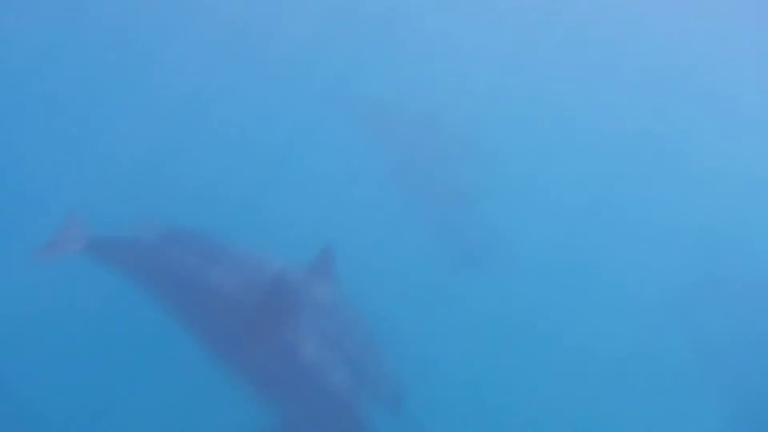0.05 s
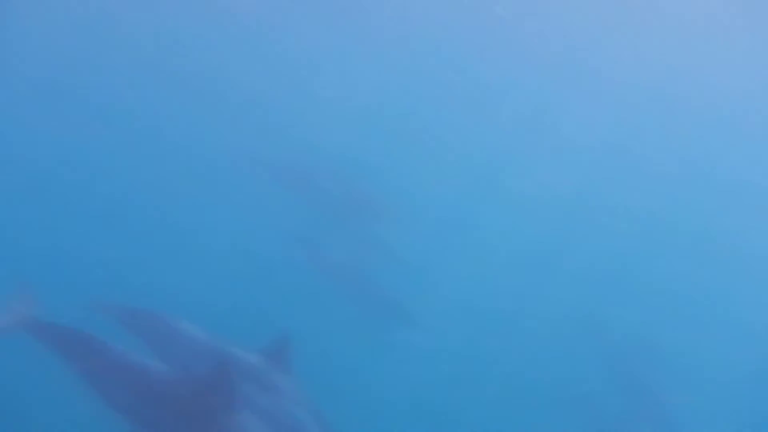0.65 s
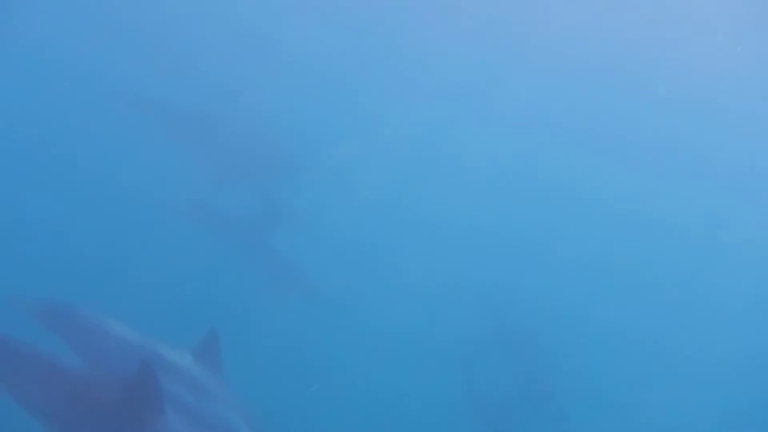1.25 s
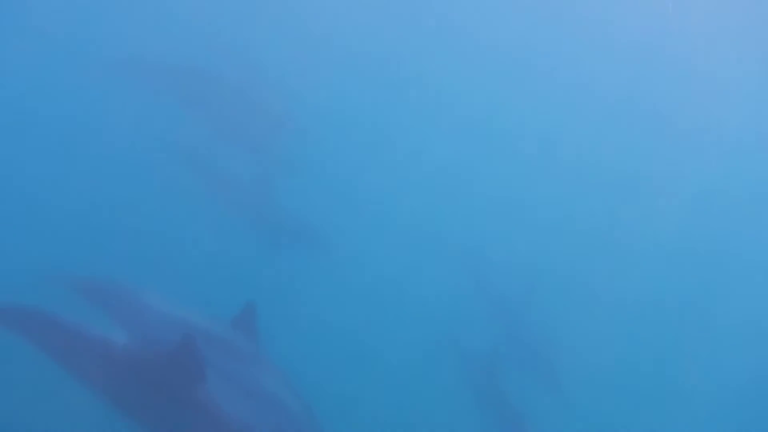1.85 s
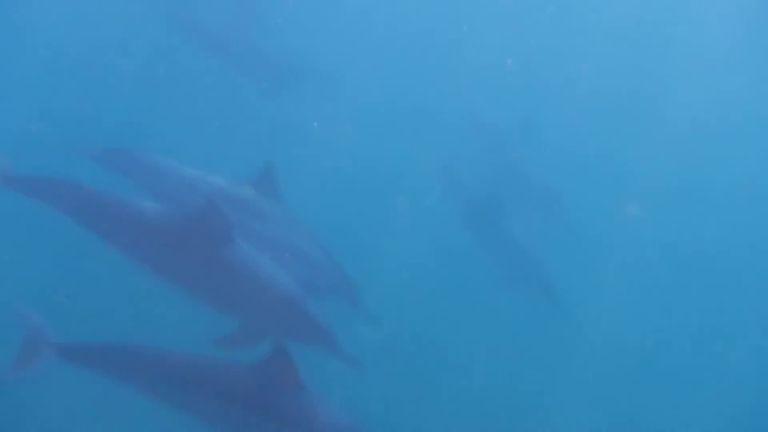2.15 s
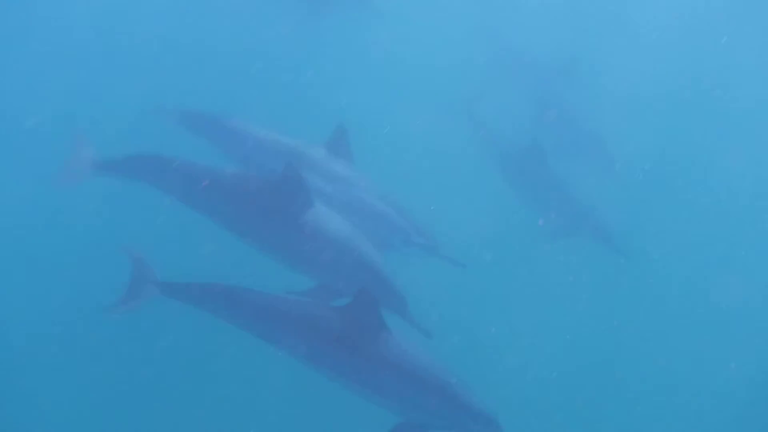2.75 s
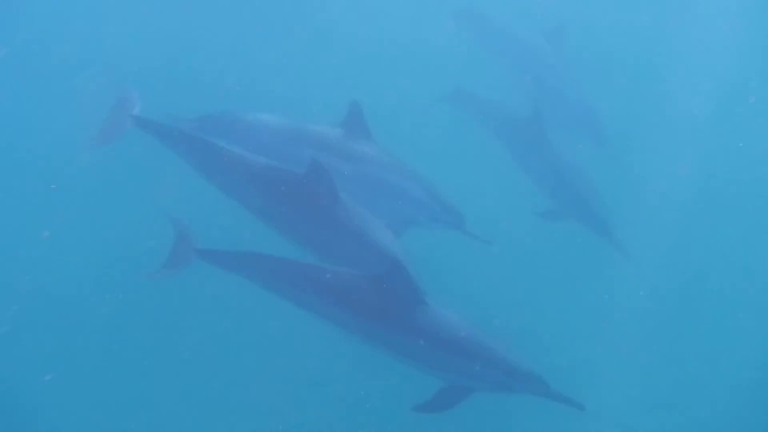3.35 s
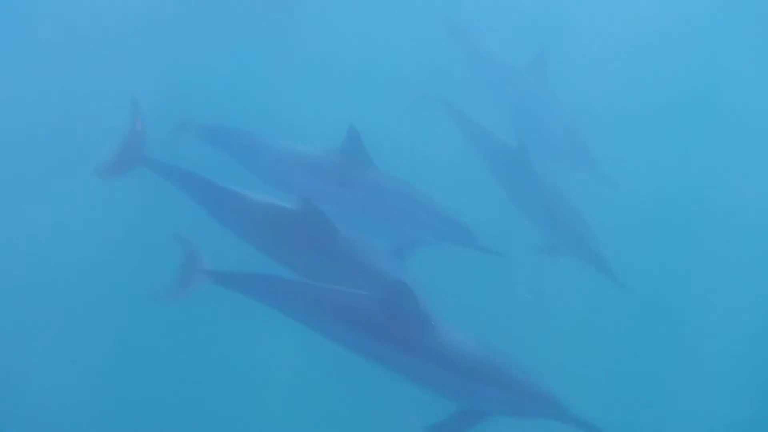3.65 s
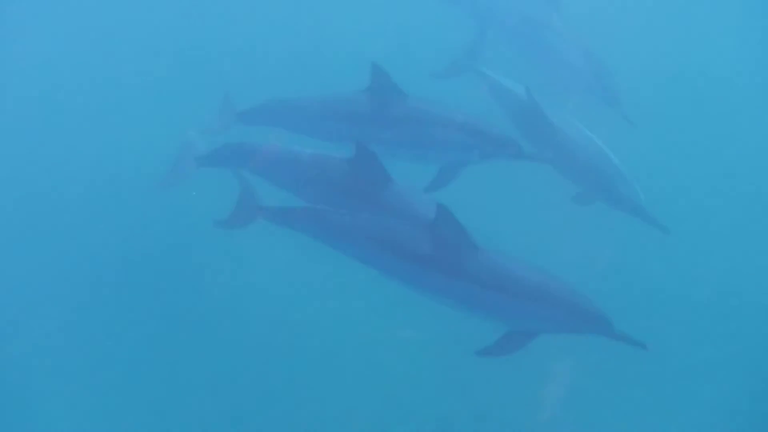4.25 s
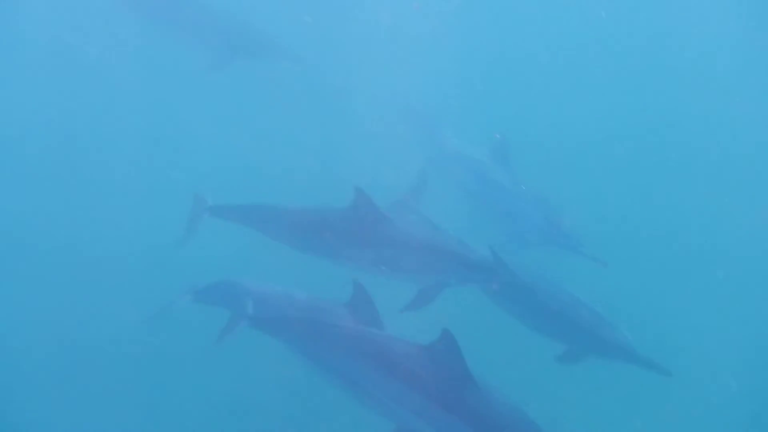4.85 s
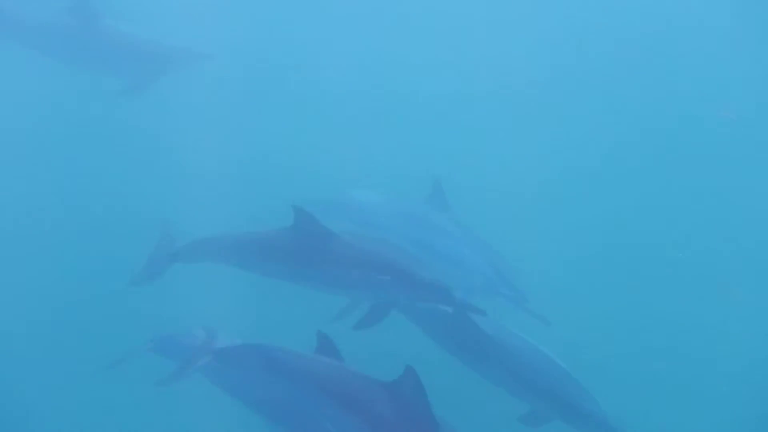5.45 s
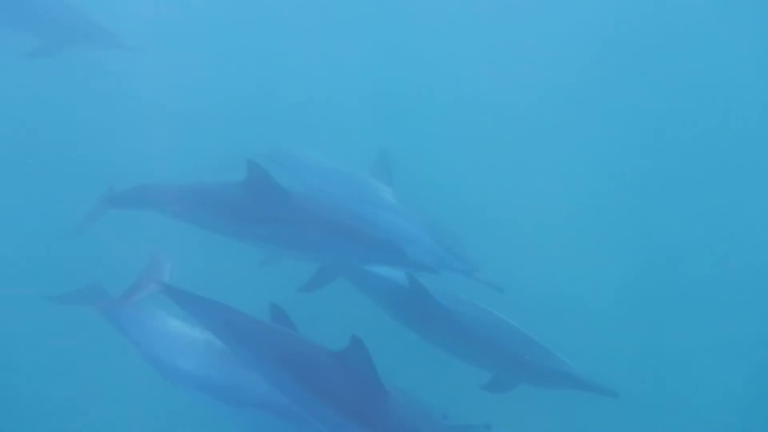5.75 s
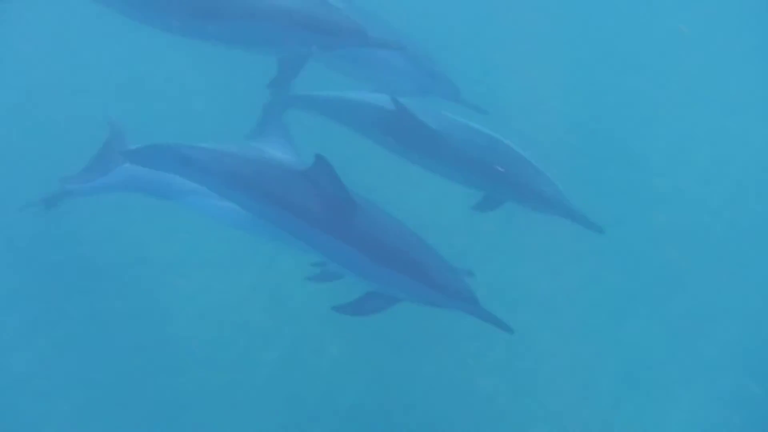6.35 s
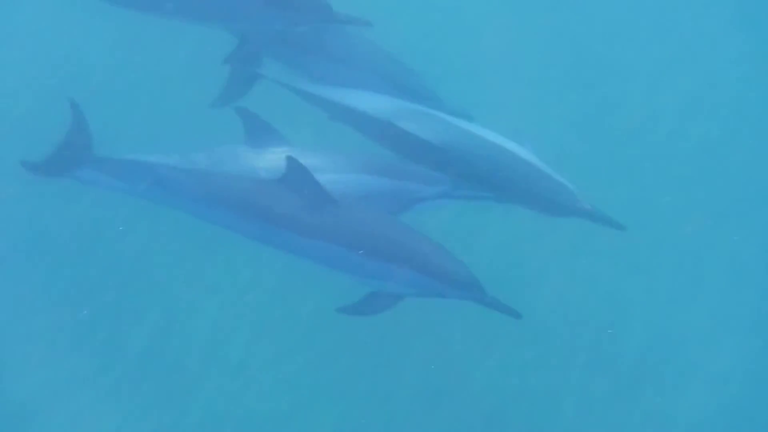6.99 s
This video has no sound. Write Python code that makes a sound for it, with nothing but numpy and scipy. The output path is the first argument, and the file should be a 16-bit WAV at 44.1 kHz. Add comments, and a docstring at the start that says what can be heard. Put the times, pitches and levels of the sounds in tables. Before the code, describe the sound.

Water rumbles, sloshes and softly fizzes throughout, heard under the open sea from a hand-held camera in a watertight case. Fingers knock on the case now and then. A hard thump at about 0.5 seconds makes the sea sink away and swell back. Close dolphins click in short trains from 1.6 to 3.2 seconds, while a faint, distant motor whines and revs from about 1.2 to 2.7. Between 3.1 and 3.9 seconds come small knocks, low plops and wet rubbing, with a hard bump at 3.8. From 4.2 seconds the close clicks return louder and hollower, with thin, quick, distant clicks until 5.4. Another rub and a cluster of sharp, loud knocks at about 5 seconds duck the sound again. Click trains carry on to nearly 7 seconds, mixed with a few dry, bright snaps, lighter knocks and plops.

```python
"""Dolphins click close by and further off, heard in the open sea on a hand-held camera's two microphones.
The camera sits in a watertight case: near click trains ring its walls, fingers knock and rub on it,
and water rumbles, sloshes and fizzes around it. A far motor whines and revs for a while.
The camera's gain control ducks at the hardest bumps, so the sea sinks away and swells back."""
import sys
import numpy as np
from scipy import signal
from scipy.fft import rfft, irfft
from scipy.io import wavfile
from scipy.ndimage import uniform_filter1d, minimum_filter1d

SR = 44100
rng = np.random.default_rng(int(sys.argv[2]) if len(sys.argv) > 2 else 0)


def generate_wav(sig):
    """Save sig (samples, or channels by samples) to the path in sys.argv[1] as 16-bit PCM at SR."""
    pcm = np.round(np.clip(np.atleast_2d(sig).T, -1, 1) * 32767).astype(np.int16)
    wavfile.write(sys.argv[1], SR, pcm)


N = 309582
TIME = np.arange(N) / SR
BINS = np.fft.rfftfreq(N, 1 / SR) + 1  # Hz, kept above zero for the log scale
AGE = np.arange(4096) / SR  # seconds into one short sound


def undb(db):
    """Decibels to gain."""
    return 10 ** (np.asarray(db) / 20)


def curve(rows, at=TIME):
    """The columns of a table, joined by straight lines."""
    times, *columns = np.transpose(rows)
    return [np.interp(at, times, column) for column in columns]


def colour(points):
    """Gain at every bin of a (frequency [Hz], level [dB]) spectrum."""
    hz, db = np.transpose(points)
    return undb(np.interp(np.log(BINS), np.log(hz), db))


def band(x, lo_hz, hi_hz, order):
    """Causal band-pass."""
    return signal.sosfilt(signal.butter(order, [lo_hz, hi_hz], "band", fs=SR, output="sos"), x)


def unit(x):
    """Scaled to rms 1."""
    return x / np.sqrt(np.mean(x ** 2))


def peak(x):
    """Scaled to peak 1."""
    return x / np.abs(x).max()


def walk(rate):
    """Random levels held 1 / rate s and smoothed twice."""
    hold = int(SR / rate)
    steps = np.repeat(rng.standard_normal(N // hold + 1), hold)
    return unit(uniform_filter1d(uniform_filter1d(steps, hold), hold)[:N])


def gate(start, end, edge_s):
    """On from start to end, with soft edges."""
    return np.clip(np.minimum(TIME - start, end - TIME) / edge_s + .5, 0, 1)


def add(track, s, sound):
    """Mix a sound in at time s."""
    i = max(int(s * SR), 0)
    track[..., i:i + sound.shape[-1]] += sound[..., :N - i]


def grains(rate, spread_db):
    """Random impulses, mostly small and a few large."""
    chance, size, sign = rng.random(N), rng.exponential(size=N), rng.choice([-1, 1], N)
    return unit((chance < rate / SR) * sign * undb(spread_db * np.minimum(size, 4)))


def burst(lo_hz, hi_hz, t60):
    """A short spit of noise, different at each microphone."""
    noise = rng.standard_normal((2, len(AGE))) * undb(-60 * AGE / t60)
    return peak(band(noise, lo_hz, hi_hz, order=3))


def pulse(hz, width_s, turn_rad=0):
    """A few cycles under a bell; the right microphone hears them turned in phase."""
    t = AGE - 2 * width_s
    return np.exp(-(t / width_s) ** 2) * np.cos(2 * np.pi * hz * t - np.array([[0], [turn_rad]]))


def mic_spectra(source):
    """Two microphones in one case: alike in the bass, unlike in the treble."""
    # stereo width: (frequency [Hz], side minus mid [dB])
    width = [(30, -10), (700, -26), (2600, 4), (4500, 3), (12000, -2)]
    return rfft(source()) + np.array([[1], [-1]]) * colour(width) * rfft(source())


def flow_layer(lo_hz, hi_hz, rate, spread_db, flicker_db):
    """One register of the flow: a swarm of grains in smooth noise, with a flickering level."""
    # spectrum of the sea at the case: (frequency [Hz], relative level [dB])
    sea = [(20, 2), (90, -2), (125, -10), (330, -6), (560, -12.5), (1500, -20), (2200, -31.5),
           (3400, -36.5), (5200, -43), (8500, -38), (16000, -53)]
    swarm = mic_spectra(lambda: grains(rate, spread_db) + rng.standard_normal(N))
    register = band(irfft(swarm * colour(sea), N), lo_hz, hi_hz, order=4)
    return unit(register * undb(flicker_db * walk(30)))


def bubbles(count, low_hz, high_hz, cycles=9, spread_db=2, tilt_db=0):
    """Bubbles ring for a few cycles each and glide up a little; strength tilts by tilt_db an octave."""
    out = np.zeros(N)
    for when, pitch, size in rng.random((count, 3)):
        hz = low_hz * (high_hz / low_hz) ** (pitch ** 1.5)
        turns = hz * AGE
        envelope = np.exp(-np.pi * turns / cycles) * (1 - np.exp(-2 * turns))
        db = tilt_db * np.log2(hz / low_hz) - spread_db * np.log(size + 0.027)
        add(out, when * TIME[-1], undb(db) * envelope * np.sin(2 * np.pi * turns * (1 + AGE)))
    return unit(out)


def water():
    """Eddies rumble on the case, bubbles patter in the slosh, small ones pop over a wash and a fizz."""
    # water streaming past the case: (time [s], relative flow [dB], wash [dB], fizz [dB])
    stream = [(0, -5.5, -49, -68), (0.2, -4.5, -45.5, -57), (0.45, -3.5, -44, -57),
              (1.15, -8.5, -46.5, -65), (1.27, -1.5, -48.5, -74), (1.5, -7.5, -45, -60.5),
              (1.82, -2, -43.5, -59), (2.2, -5, -45, -59.5), (2.58, -6.5, -41, -51), (2.95, -3.5, -41, -55),
              (3.45, -2.5, -43, -57.5), (3.95, 1, -41, -62), (4.5, 2.5, -40.5, -59),
              (4.87, 1.5, -36.5, -49.5), (5.3, -1.5, -42, -62.5), (5.7, 0, -42, -61.5),
              (6.6, -4.5, -42.5, -58.5), (6.85, -1, -40, -50)]
    flow_db, wash_db, fizz_db = curve(stream)
    rumble_db, slosh_db = flow_db - 21.5, flow_db - 31.5
    pops = mic_spectra(lambda: bubbles(450, 1000, 3500, cycles=7, spread_db=2.4, tilt_db=-5))
    return (flow_layer(22.2, 209.3, rate=400, spread_db=1.6, flicker_db=2.9) * undb(rumble_db)
            + flow_layer(202, 1056, rate=250, spread_db=3, flicker_db=2.2) * undb(slosh_db)
            + bubbles(230, 270, 620) * undb(slosh_db)
            + flow_layer(940, 4350, rate=1500, spread_db=2, flicker_db=1.2) * undb(wash_db)
            + unit(irfft(pops, N)) * undb(wash_db - 4)
            + flow_layer(3900, 16000, rate=500, spread_db=3.6, flicker_db=2.2) * undb(fizz_db))


def camera_whine(hz=14835, db=-76):
    """The camera's own faint, steady tone."""
    return undb(db) * np.sin(2 * np.pi * hz * TIME)


def high_ticks(db=-34):
    """A few very high ticks, all equally strong."""
    # ticks: (time [s])
    ticks = [0.054, 0.1635, 0.254, 1.106]
    out = np.zeros((2, N))
    for s in ticks:
        add(out, s + 0.001, undb(db) * burst(10400, 12600, t60=0.0056))
    return out


def case_ring(push, scatter_db=3):
    """The case answers a push with its modes, a little differently at each spot."""
    # modes of the case: (frequency [Hz], level [dB], t60 [s])
    case_modes = [(186.3, 3.5, 0.062), (339, -14.5, 0.094), (465, 3.5, 0.044), (673, -6.5, 0.035),
                  (789, 2.5, 0.02), (994, -7.5, 0.042)]
    hz, db, t60 = np.transpose(case_modes)[:, :, None]
    detune, weight = rng.standard_normal((2, len(case_modes), 1))
    envelopes = undb(db + scatter_db * weight - 60 * AGE / t60)
    modes = envelopes * np.sin(2 * np.pi * hz * (1 + 0.049 * detune) * AGE)
    return peak(signal.fftconvolve(modes.sum(0), push)[:len(AGE)])


def finger_knocks(blow_db=-2, ring_db=-9, contact_db=9, late_s=0.001096):
    """A blow dents the wall for about one cycle, the case rings on, and a hard contact cracks."""
    # fingers on the case: (time [s], level [dB], pitch of the blow [Hz], relative crack [dB])
    knocks = [(0.105, -9, 515, -41), (0.223, -3, 670, -25), (0.3051, 3, 377, -19),
              (0.469, 21.5, 153, -24.5), (0.602, 3.5, 564, -27), (0.704, -8, 380, -32),
              (1.785, 2, 480, -21.5), (1.891, 9, 405, -19.5), (2.096, 1.5, 370, -40),
              (2.127, 0.5, 445, -31.5), (2.175, 1.5, 510, -31.5), (2.854, -7.5, 245, -24.5),
              (3.13, -5, 356, -30), (3.164, -4.5, 158, -28), (3.211, -1.5, 476, -26.5),
              (3.239, 1.5, 134, -26.5), (3.308, -4.5, 410, -28), (3.407, -9.5, 534, -22.5),
              (3.47, 3, 278, -26), (3.547, -1.5, 570, -22), (3.5802, -4.5, 913, -9.5),
              (3.807, 22, 631, -24.5), (4.223, 2.5, 525, -31), (4.406, 0, 463, -31), (4.449, 5, 523, -37),
              (4.9369, 1.5, 145, -30), (5.0207, 13.5, 765, -6), (5.0221, 16.5, 580, -12),
              (5.061, 21, 627, -24.5), (6.163, 9.5, 555, -19.5), (6.36, 4.5, 392, -36),
              (6.778, -7, 440, -34), (6.874, -6.5, 474, -22)]
    out = np.zeros((2, N))
    for s, db, hz, crack_db in knocks:
        dent_s = min(0.473 / hz, .002)
        blow = -pulse(hz, dent_s)[0]
        brightness = undb(1.4 * max(crack_db + 14, 0))  # the hardest contacts are also brighter
        treble = undb(-8.5) * burst(1550, 3340, t60=0.0066) + undb(-21) * burst(1900, 8960, t60=0.0019)
        contact = burst(683, 1603, t60=0.015)[0] + brightness * treble
        ring = case_ring(blow + .5 * pulse(580, 0.00067)[0])
        add(out, s + late_s, undb(db) * (undb(blow_db) * blow + undb(ring_db) * ring))
        add(out, s + late_s + dent_s, undb(db + crack_db + contact_db) * contact)
    return out


def near_clicks(beam_power=4.3):
    """Time and level of each click: gaps glide evenly; the narrow beam swings on or off late in a train."""
    # near trains: (start [s], end [s], first gap [s], last gap [s], level [dB], swell [dB])
    trains = [(0.558, 0.624, 0.066, 0.066, -14, -2.5), (1.598, 1.879, 0.062, 0.079, -16.5, 4.5),
              (1.956, 2.32, 0.07, 0.051, -19, -4.5), (2.374, 2.593, 0.047, 0.056, -22.5, 5.5),
              (2.65, 2.876, 0.066, 0.091, -23.5, 8.5), (2.931, 3.162, 0.087, 0.066, -25.5, 10.5),
              (4.194, 4.333, 0.073, 0.074, -11, 1), (4.397, 4.499, 0.052, 0.052, -11.5, -2.5),
              (4.604, 4.877, .14, 0.13, -15.5, 2), (5.489, 5.778, .089, .057, -14, -0.5),
              (5.849, 6.051, .087, 0.11, -12.5, -2), (6.252, 6.335, .083, .083, -15, 5.5),
              (6.392, 6.544, 0.05, 0.051, -11, -1.5), (6.611, 6.87, .073, 0.099, -15, 0.5)]
    for start, end, first_gap, last_gap, db, swell_db in trains:
        gaps = np.linspace(first_gap, last_gap, round(2 * (end - start) / (first_gap + last_gap)))
        progress = np.append(0, np.cumsum(gaps)) / gaps.sum()
        yield from zip(start + (end - start) * progress, db + swell_db * progress ** beam_power)


def near_dolphins(wall_db=3, wall_hz=860, hum_hz=290, late_s=0.001086):
    """Each close click is a high snap, a short ring near 2 kHz, and a hollow knock and hum of the case."""
    # tone of the clicks as the animals turn, levels relative to the click:
    # (time [s], ring pitch [Hz], ring width [s], ring [dB], snap [dB], hum [dB])
    click_tone = [(1.9, 1900, 0.0002, -4, -21, -22), (2.8, 1950, 0.00023, 3.5, -10, -24),
                  (4.3, 1660, 0.00076, -5, -20.5, -6), (6.2, 1770, 0.0017, -8.5, -17.5, 2),
                  (6.35, 1890, 0.0015, -10.5, -29.5, -12.5)]
    out = np.zeros((2, N))
    hum = np.sin(2 * np.pi * hum_hz * AGE) * undb(-60 * AGE / 0.091)
    for s, db in near_clicks():
        hz, width_s, ring_db, snap_db, hum_db = curve(click_tone, s)
        ring = pulse(hz * (1 + 0.028 * rng.standard_normal()), width_s, turn_rad=0.76)
        wall = case_ring(pulse(wall_hz, 0.00083)[0], scatter_db=1)
        snap = burst(4000, 15500, t60=0.012)
        ring_centre_s = s + late_s + 0.00197
        add(out, s + late_s / 2, undb(db + wall_db) * wall + undb(db + hum_db) * hum)
        add(out, ring_centre_s - 2 * width_s, undb(db + ring_db) * ring)
        add(out, s + late_s + 0.00095, undb(db + snap_db) * snap)
    return out


def far_dolphins(hz=2830, pitch_scatter=0.044, scatter_db=2):
    """Thin, quick clicks from further off, too weak to shake the case and each a little different."""
    # distant trains: (start [s], end [s], gap [s], level [dB])
    trains = [(0.911, 1.12, 0.047, -37), (4.369, 4.64, 0.0358, -29), (4.662, 5.006, 0.0407, -24),
              (5.076, 5.36, .0435, -29)]
    out = np.zeros((2, N))
    for start, end, gap, db in trains:
        for s in np.arange(start, end, gap):
            pitch, size = rng.uniform(-1, 1, 2)
            click = pulse(hz * (1 + pitch_scatter * pitch), 0.0007, turn_rad=1)
            add(out, s, click * undb(db + scatter_db * size))
    return out


def far_motor(span_s=(1.17, 2.68), centre_hz=2750, width_hz=300, line_hz=2505, line_db=-62):
    """A far motor's overtones slide through one resonance as it revs, over a nearly steady line."""
    # the motor's revs: (time [s], turning rate [Hz])
    revs = [(1.31, 309), (1.37, 341), (1.44, 351), (1.54, 336), (1.62, 357), (1.75, 331), (1.82, 354),
            (2.05, 329), (2.28, 348), (2.58, 485)]
    hz, = curve(revs)
    phase = 2 * np.pi * np.cumsum(hz) / SR
    whine = sum(np.sin(k * phase) / (1 + ((k * hz - centre_hz) / width_hz) ** 2) for k in range(5, 12))
    whine_db = np.interp(TIME, span_s, (-57.5, -51.5))
    line = np.sin(2 * np.pi * np.cumsum(line_hz + 6 * walk(60)) / SR)
    flicker = undb(3 * walk(20))
    return gate(*span_s, edge_s=0.22) * (undb(whine_db) * whine + undb(line_db) * line) * flicker


def plops(cycles=5):
    """A pocket of air or water breaks loose beside the case and rings for a few cycles."""
    # larger bubbles and eddies: (time [s], pitch [Hz], level [dB])
    pockets = [(2.753, 317, -11), (3.142, 62, -10.5), (3.457, 71, -12), (6.196, 108.4, -7.5),
               (6.839, 139, -12.5)]
    out = np.zeros(N)
    for s, hz, db in pockets:
        turns = hz * AGE
        envelope = np.exp(-turns / cycles) * (1 - np.exp(-2 * turns)) * (1 - AGE / AGE[-1])
        add(out, s, undb(db) * envelope * np.sin(2 * np.pi * turns))
    return out


def grip_slips(split_hz=1250, gurgle_db=-3):
    """Fingers stick and slip in a dense, uneven run of small jerks; trapped water gurgles."""
    # slips on the case: (start [s], end [s], first level [dB], last level [dB], relative rasp [dB])
    slips = [(3.203, 3.272, -21, -18.5, -20), (3.565, 3.633, -15.5, -31, -4.5),
             (3.638, 3.868, -13, -12, -17.5), (4.937, 5.032, -14, -14.5, -23.5)]
    # spectrum of the rubbing: (frequency [Hz], relative level [dB])
    rub_spectrum = [(40, -10), (170, 13.5), (720, 2), (1200, -29), (2100, -43), (3900, -48), (5500, -64),
                    (15000, -78)]
    jerks = mic_spectra(lambda: grains(rate=2000, spread_db=0.82)) * colour(rub_spectrum)
    low_share = 1 / (1 + (BINS / split_hz) ** 6)
    rub = unit(irfft(jerks * low_share, N))
    wet_rub = unit(rub + undb(gurgle_db) * bubbles(1200, 401, 927))
    rasp = unit(irfft(jerks * (1 - low_share), N)) * undb(1.5 * walk(40))
    out = np.zeros((2, N))
    for start, end, first_db, last_db, rasp_db in slips:
        db = np.interp(TIME, [start, end], [first_db, last_db])
        out += gate(start, end, edge_s=0.0025) * undb(db) * (wet_rub + undb(rasp_db) * rasp)
    return out


def pod_snaps(rattle_db=-3):
    """Dry, bright snaps from elsewhere in the pod: a sharp tick over a brief rattle of the case."""
    # snaps: (time [s], level [dB])
    snaps = [(5.380, -26), (5.452, -31.5), (5.565, -26.5), (5.692, -28), (6.200, -30), (6.43, -25.5),
             (6.809, -23)]
    out = np.zeros((2, N))
    for s, db in snaps:
        tick, rattle = burst(2400, 11700, t60=0.0034), burst(1700, 3800, t60=0.052)
        add(out, s, undb(db) * (tick + undb(rattle_db) * rattle))
    return out


def gain_control(x, limit_db=-0.75, recover_db_per_s=14.5, look_ahead_s=0.0015):
    """Any peak over the limit turns the gain down at once; it then creeps back at a steady rate."""
    over_db = np.maximum(20 * np.log10(np.abs(x).max(axis=0) + 1e-9) - limit_db, 0)
    creep_db = recover_db_per_s * TIME
    gain_db = creep_db - np.maximum.accumulate(over_db + creep_db)
    span = int(2 * look_ahead_s * SR) + 1
    return x * undb(uniform_filter1d(minimum_filter1d(gain_db, span), span))


def noise_suppressor(x, threshold_db=-80.5, db_per_db=1.5, above_hz=4300, window_s=.012):
    """Treble that falls under the threshold is turned further down."""
    treble = irfft(rfft(x) / (1 + (above_hz / BINS) ** 12), N)
    power = uniform_filter1d((treble ** 2).mean(axis=0), int(window_s * SR))
    under_db = np.minimum(10 * np.log10(np.abs(power) + 1e-14) - threshold_db, 0)
    return x + treble * (undb(db_per_db * under_db) - 1)


def scene():
    """Everything reaches the two microphones through the case."""
    # the left microphone hears the walls better: (frequency [Hz], left minus right [dB])
    balance = [(30, 1), (1100, 3.5), (2300, -2.1)]
    total = (water() + plops() + pod_snaps() + near_dolphins() + far_dolphins() + high_ticks()
             + finger_knocks() + grip_slips() + far_motor() + camera_whine())
    return irfft(rfft(total) * colour(balance) ** np.array([[.5], [-.5]]), N)


def record(dry):
    """The camera ducks after hard bumps, mutes faint hiss, rounds off the peaks and cuts the top."""
    held = noise_suppressor(gain_control(dry))
    rounded = held / (1 + held ** 6) ** (1 / 6)
    return signal.sosfilt(signal.ellip(8, .2, 70, 16300, fs=SR, output="sos"), rounded)


dry = scene()
out = record(dry)
generate_wav(out)
```